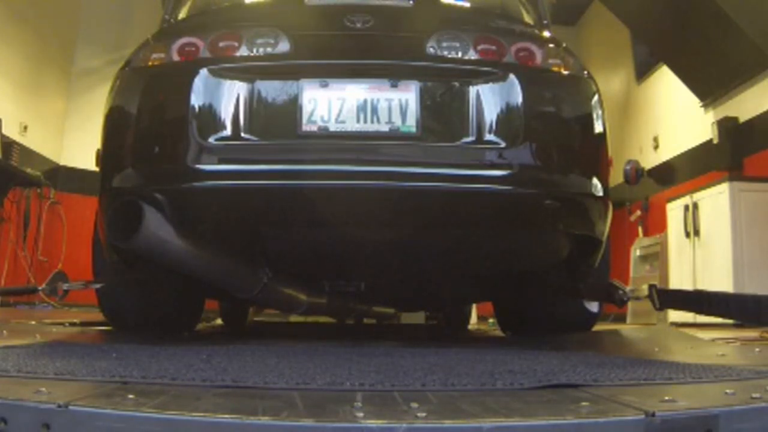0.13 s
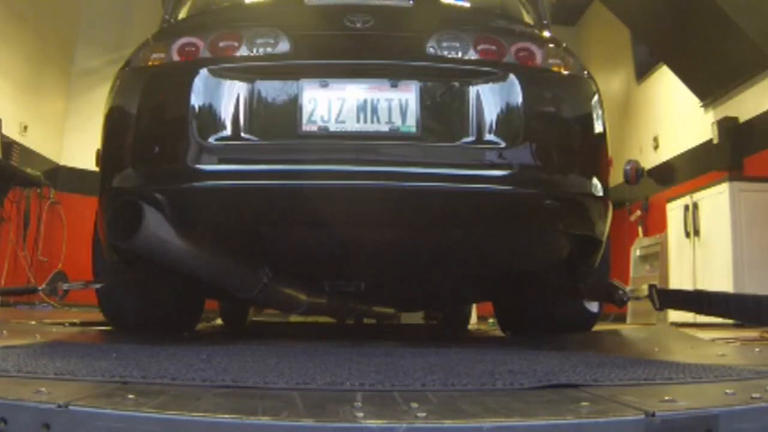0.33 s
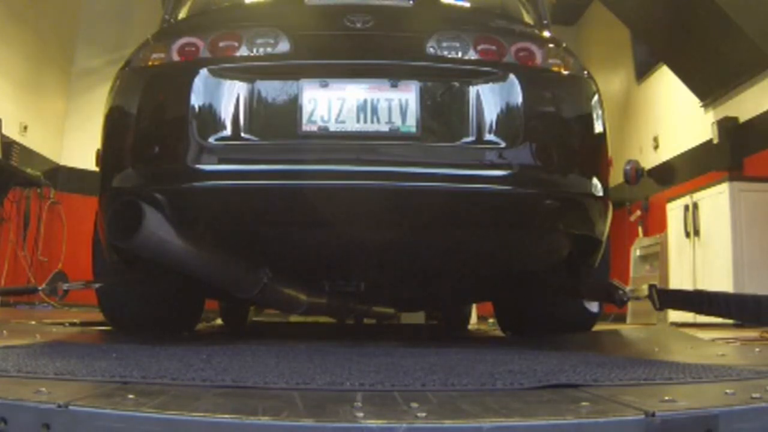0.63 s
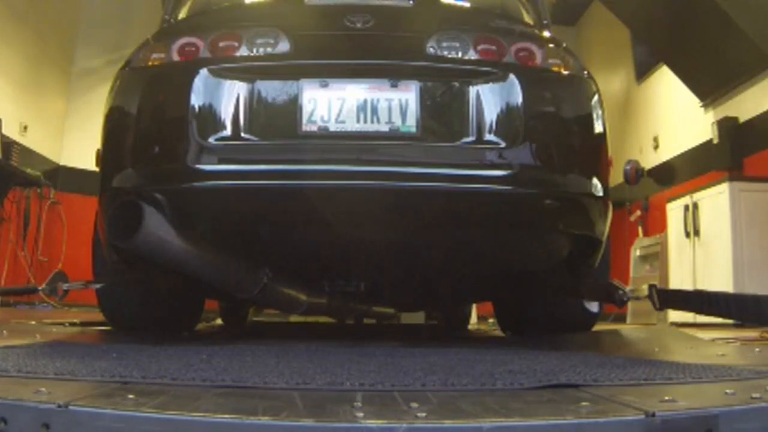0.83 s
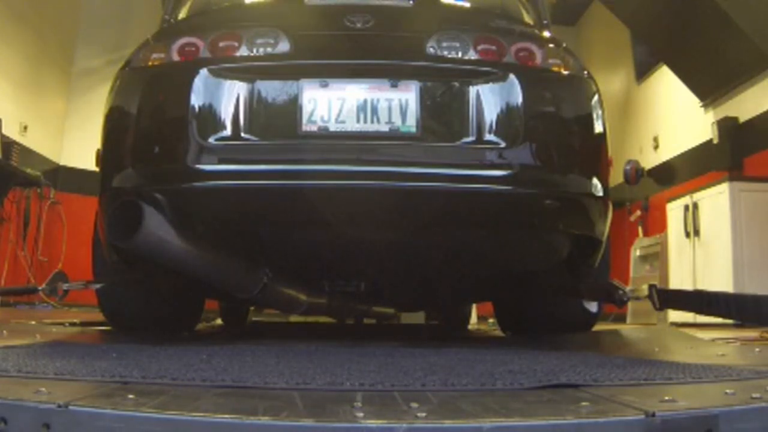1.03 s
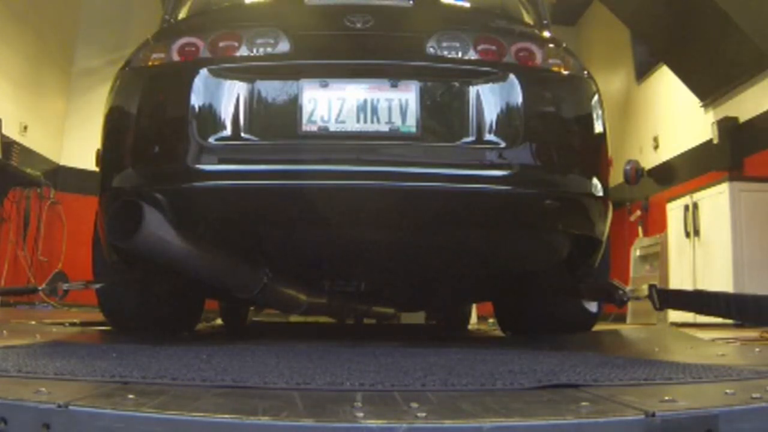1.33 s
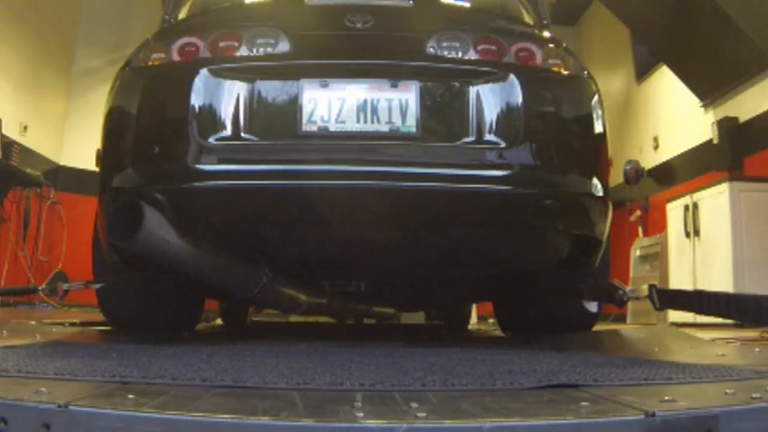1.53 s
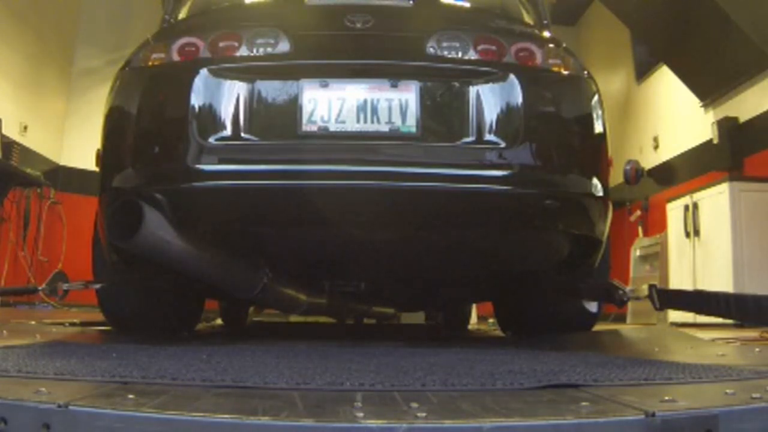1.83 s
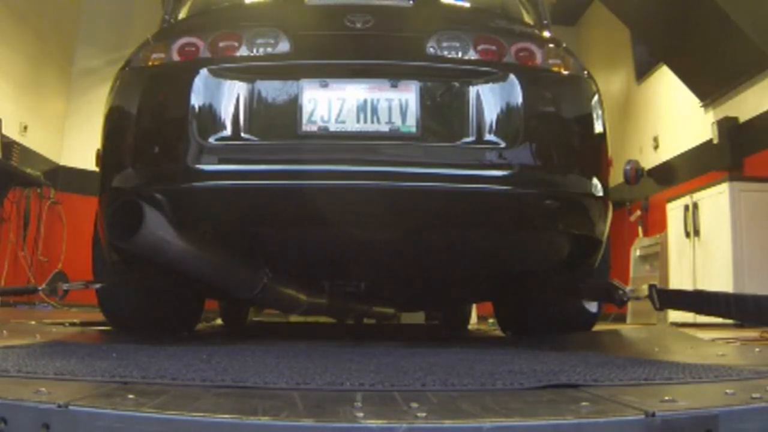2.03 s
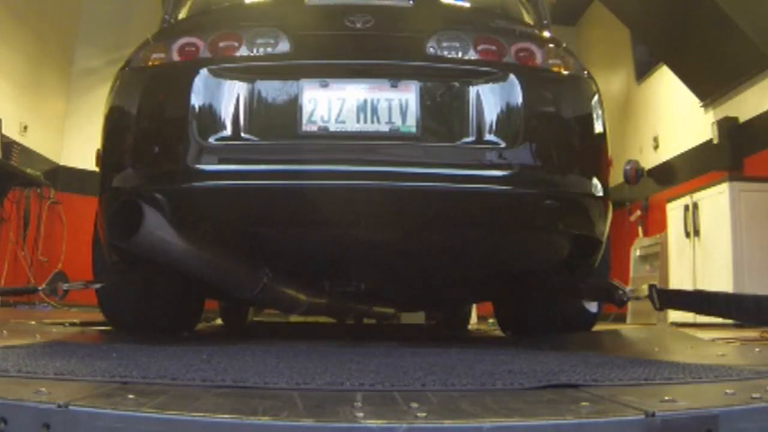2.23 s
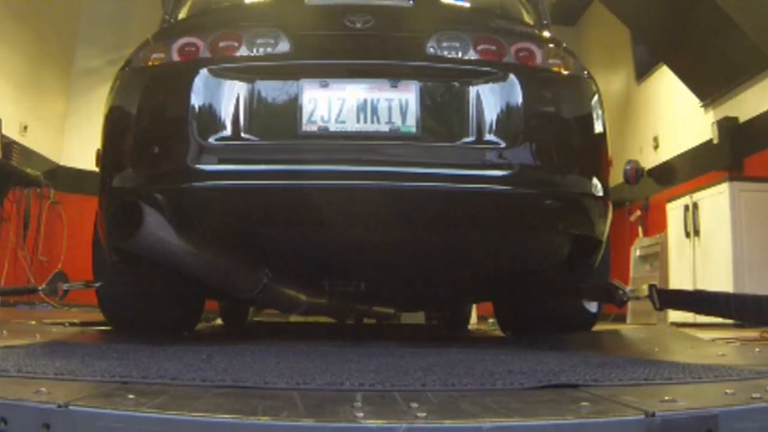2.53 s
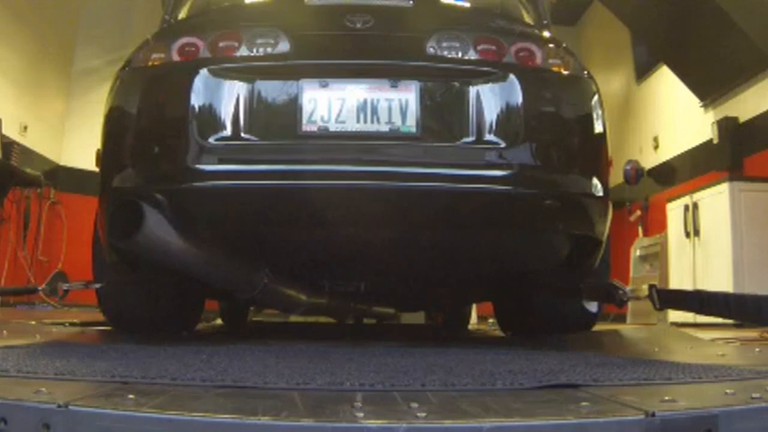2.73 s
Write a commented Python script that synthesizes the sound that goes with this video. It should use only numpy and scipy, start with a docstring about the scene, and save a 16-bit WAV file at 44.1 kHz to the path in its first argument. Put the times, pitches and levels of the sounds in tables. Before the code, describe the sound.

Close exhaust sound of a six-cylinder car in a workshop, low uneven idle first, then thudding pops and a quick rev, a short dip, another surge, a crackling burst and a rough, clipped roar with rushing gas.

```python
"""A six-cylinder engine heard from behind its tailpipe in a workshop: a lumpy idle, a rise to a held speed,
a second pull, a burst of misfires, then a loud steady howl that overloads the microphone.
The engine note is a stack of multiples of the firing rate; uneven firing adds burble and roar,
and gas rushes out as puffs of hiss. Pops are sudden pressure jumps with hiss, echoed by the workshop."""
import sys
import numpy as np
from scipy import signal
from scipy.fft import rfft, irfft, next_fast_len
from scipy.io import wavfile
from scipy.ndimage import uniform_filter1d

SR = 44100
rng = np.random.default_rng(int(sys.argv[2]) if len(sys.argv) > 2 else 0)


def dump(signal):
    """Clip the signal to [-1, 1] and save it as 16-bit WAV at the path in sys.argv[1]."""
    limited = np.clip(np.atleast_2d(signal).T, -1, 1)
    pcm = np.round(limited * 32767).astype(np.int16)
    wavfile.write(sys.argv[1], SR, pcm)


N = 127890

# Tone colour of the deep exhaust roar: f/Hz, relative level per Hz/dB
ROAR_COLOUR = [(200, -4.5), (450, -0.5), (700, -3.5), (950, -0.5), (1120, -7), (1350, -17.5)]
# Tone colour of the rushing gas: f/Hz, relative level per Hz/dB
RUSH_COLOUR = [(650, -18), (1100, -2), (1360, -3), (1570, -3), (1860, -6), (2020, -3.5), (2600, -11.5),
               (3040, -6.5), (3800, -14), (5500, -33.5)]
# Tone colour of the gas's treble hiss: f/Hz, relative level per Hz/dB
TREBLE_COLOUR = [(2650, -25.5), (4500, -2), (5200, -5), (7590, -16.5), (8820, -11.5), (9680, -18.5),
                 (10600, -21), (13400, -30), (15500, -46)]


def amp(db):
    """Turns decibels into an amplitude factor."""
    return 10 ** (np.asarray(db) / 20)


def rms_one(x):
    """Scales a signal to an rms (average strength) of 1."""
    return x / np.sqrt(np.mean(x ** 2) + 1e-20)


def in_time(rows):
    """Draws straight lines between table rows, giving one curve per column after the time."""
    s, *columns = np.transpose(rows)
    t = np.arange(N) / SR
    return [np.interp(t, s, column) for column in columns]


def drift(rate_hz):
    """Slow random wandering of rms 1: noise smoothed by two equal low-pass stages."""
    step = 40  # samples between the points of the slow curve
    r = np.exp(-2 * np.pi * step * rate_hz / SR)
    noise = rng.standard_normal(N // step + 2002)
    slow = signal.lfilter([1], [1, -2 * r, r * r], noise)[2000:]  # skip the filter's start-up
    return np.interp(np.arange(N) / step, np.arange(len(slow)), rms_one(slow))


def colour(x, spectrum):
    """Shapes x by a spectrum and the pipe's resonances, never sounding ahead of x; rms 1."""
    # Resonances of the pipe: f/Hz, width/Hz, lift/dB
    pipe = [(391, 8.8, 11.5), (885, 11, 7), (1049, 11, 9), (1788, 256, 10.5), (3155, 230, 2.5),
            (5140, 450, 5)]
    f = np.maximum(np.fft.rfftfreq(N, 1 / SR), 1)
    hz, db = np.transpose(spectrum)
    octaves_outside = np.abs(np.log2(f / np.clip(f, hz[0], hz[-1])))
    shape_db = np.interp(np.log(f), np.log(hz), db) - 40 * octaves_outside
    for centre_hz, width_hz, lift_db in pipe:
        shape_db = shape_db + lift_db / (1 + (2 * (f - centre_hz) / width_hz) ** 2)
    # Folding the cepstrum onto its first half makes the filter respond only after its input
    cepstrum = irfft(np.log(amp(np.maximum(shape_db, -120))), N)
    cepstrum[1:N // 2] *= 2
    cepstrum[N // 2 + 1:] = 0
    return rms_one(irfft(rfft(x) * np.exp(rfft(cepstrum)), N))


def orders(turns, rate_hz, levels_db, roar_db):
    """Multiples of the firing rate line up into one pressure dip per firing; some are weak and late."""
    # How the firings go: t/s, unevenness (0-1), lean of the dip toward a sharp rise/rad
    firing = [(0, .14, .9), (.58, .17, .9), (.65, .33, 1.0), (.95, .25, 1.2), (1.28, .12, 1.3),
              (1.38, .11, .6), (2.25, .08, .5), (2.29, 1., 1.5), (2.44, 1., 1.5), (2.47, .1, 1.5),
              (2.9, .07, 1.5)]
    # Orders above five, against the roar: f/Hz, level/dB
    upper_orders = [(330, -10), (780, -22), (1030, -10), (1200, -26.5), (1900, -19.5), (2150, -37)]
    waver_db, waver_hz = .9, 14  # each order wavers in level on its own

    uneven, lean = in_time(firing)
    weak, late = (np.interp(turns + .5, np.arange(2000), u) for u in rng.random((2, 2000)))
    angle = 2 * np.pi * (turns - uneven ** 2 * late)
    hz, upper_db = np.transpose(upper_orders)
    upper = [roar_db + np.interp(np.log(k * rate_hz), np.log(hz), upper_db, right=-60)
             for k in range(6, 19)]
    tone = np.zeros(N)
    for k, db in enumerate([*levels_db, *upper], 1):
        level = np.sqrt(2) * amp(db + waver_db * drift(waver_hz))
        tone -= level * np.cos(k * angle + lean)
    return tone * (1 + uneven * (1 - 2 * weak))


def gas(turns, rate_hz, burble_db, roar_db, rush_db, treble_db):
    """Each firing is stronger or weaker than the mean (burble, roar) and blows a puff of hiss."""
    # Tone colour of the low burble: f/Hz, relative level per Hz/dB
    burble_colour = [(42, -34.5), (60, 9), (88, 6), (130, 3), (200, -6), (300, -4.5), (420, -13),
                     (600, -29)]
    puff_share, puff_sharpness = .26, 2.04  # pulsing part of the hiss (0-1), fading per firing cycle
    flicker_db, flicker_hz = .6, 6.9  # rush and treble flicker together

    cycle = np.floor(turns).astype(int)
    fired = np.diff(np.floor(turns), prepend=0) > 0
    size = np.sqrt(3) * rng.uniform(-1, 1, N)[cycle]  # one random strength per firing, spread 1
    kicks = fired * size * np.sqrt(SR / rate_hz)
    puff = np.exp(-puff_sharpness * (turns % 1)) * amp(3.7 * size)
    hiss = rng.standard_normal((3, N)) * (1 - puff_share + puff_share * rms_one(puff))
    flicker = amp(flicker_db * drift(flicker_hz))

    burble = amp(burble_db) * colour(kicks + .39 * hiss[0], burble_colour)
    roar = amp(roar_db) * colour(.11 * kicks + hiss[0], ROAR_COLOUR)
    rush = flicker * amp(rush_db) * colour(hiss[1], RUSH_COLOUR)
    treble = flicker * amp(treble_db) * colour(hiss[2], TREBLE_COLOUR)
    return burble + roar + rush + treble


def pops():
    """Late burns bang in the pipe: pressure sags, jumps up and dies away, with a burst of hiss."""
    # Each pop: t/s, jump level/dB, half length/ms, hiss level/dB
    pop_rows = [(0.6127, -4, 3, -33), (.680, -16, 2.6, -33), (0.7961, -2, 2.2, -36), (0.906, -9, 2.2, -40),
                (0.995, -9.5, 2.36, -33), (1.154, -9, 2.1, -34), (1.2085, -8, 1.5, -32),
                (1.273, -8, 1.5, -30), (2.3125, -2, 0.5, -24), (2.3325, -3, 0.7, -23),
                (2.336, -4, 0.55, -22), (2.3572, -2, 0.4, -17), (2.364, -3, .5, -11), (2.418, -2, 0.5, -7),
                (2.459, -4, 0.36, -9), (2.746, -8, 1, -11)]
    jump_steepness = 5.
    crack_t60_s, crack_treble_db = .036, -25  # time for the hiss to fall 60 dB, share of its treble

    jumps, hits = np.zeros(N), np.zeros(N)
    for s, db, half_ms, hiss_db in pop_rows:
        near = slice(max(int((s - .03) * SR), 0), int((s + .03) * SR))
        u = (np.arange(N)[near] / SR - s) * 1000 / half_ms  # time from the jump, in half lengths
        jumps[near] += amp(db) * np.tanh(jump_steepness * u) * np.exp(.5 - u ** 2)
        hits[int(s * SR)] = amp(hiss_db)
    fading = signal.lfilter([1], [1, -amp(-60 / (crack_t60_s * SR))], hits)
    burst = uniform_filter1d(fading, size=30)  # softens the onset
    hiss = colour(rng.standard_normal(N), RUSH_COLOUR) + colour(rng.standard_normal(N), ROAR_COLOUR)
    hiss += amp(crack_treble_db) * colour(rng.standard_normal(N), TREBLE_COLOUR)
    return jumps + burst * hiss


def workshop(x):
    """Room echo from eight repeating delays whose high pitches die away sooner."""
    t60_s = .17  # time for the lowest pitches to fall 60 dB
    delays_s = [.0253, .0291, .0337, .0379, .0421, .0473, .0529, .0587]
    size = next_fast_len(N + SR)
    f = np.fft.rfftfreq(size, 1 / SR)
    echoes = 0
    for k, delay_s in enumerate(delays_s):
        kept = amp(-60 * delay_s * (1 + f / 3000) / t60_s)  # what survives each pass
        one_pass = kept * np.exp(-2j * np.pi * f * delay_s)
        echoes = echoes + (-1) ** k * (1 / (1 - one_pass) - 1)
    return irfft(rfft(x, size) * echoes, size)[:N]


def scene():
    """One running count of firings drives the note and the gas; the pops also echo in the workshop."""
    # Firing rate and its first five orders: t/s, f/Hz, then order 1, 2, 3, 4, 5 level/dB
    engine = [(0, 58.27, -30, -22, -13.5, -16, -29), (.14, 58.53, -28, -51, -19, -14, -24),
              (.19, 58.89, -28, -18, -18.5, -16.5, -57), (.27, 58.62, -26, -37.5, -11, -19, -15.5),
              (.34, 59.66, -29, -17, -28, -19, -21), (.385, 59.43, -15, -13, -13.5, -38, -40),
              (.47, 59.9, -28, -35, -16, -13.5, -22), (.54, 59.58, -23, -18, -23.5, -21, -19.5),
              (.61, 59.43, -35, -31, -19.5, -21, -40.5), (.7, 59.75, -24.5, -12, -24.5, -22, -18.5),
              (.85, 63.26, -20, -29.5, -25, -42, -32.5), (.96, 66.58, -18, -18.5, -24, -37, -20.5),
              (1.04, 68.91, -28, -17, -36, -28.5, -28.5), (1.15, 73.05, -18, -16.5, -26.5, -27.5, -39),
              (1.2, 74.75, -19.5, -18, -36.5, -20.5, -28), (1.25, 75.82, -20, -15.5, -22.5, -32, -41),
              (1.32, 91.93, -12.5, -24, -29, -49, -34), (1.4, 114.3, -17.5, -18.5, -20, -20.5, -27),
              (1.46, 129.6, -16.5, -21.5, -16, -28, -27.5), (1.54, 142.5, -12, -24.5, -24.5, -24, -37),
              (1.61, 149.2, -13, -17.5, -26, -30, -31), (1.77, 149.5, -20.5, -18, -33, -38.5, -42),
              (1.87, 142.5, -15.5, -29, -33, -31.5, -44), (1.95, 141.1, -11.5, -19, -25.5, -21, -28.5),
              (2.03, 152.7, -13, -16, -19.5, -27, -30), (2.11, 178.3, -20, -20.5, -23, -22.5, -23),
              (2.23, 234.3, -20.5, -17.5, -22, -26, -28), (2.3, 251.6, -24.5, -21.5, -44, -39, -51),
              (2.43, 247.7, -29, -35, -25, -14.5, -26), (2.48, 243.7, -21, -26.5, -24.5, -29, -27),
              (2.56, 241.9, -29, -12, -12.5, -10, -40), (2.9, 237.6, -16, -13, -14, -10.5, -27)]
    # Uneven firing and gas: t/s, burble level/dB, roar level/dB, rush level/dB, treble level/dB
    gas_levels = [(0.0, -19, -39, -40, -58), (0.02, -22, -29, -42, -60), (0.11, -18, -29.5, -35, -52.5),
                  (0.16, -10.5, -29, -35, -55), (0.18, -18, -30, -38, -57.5),
                  (0.35, -15, -26.5, -33.5, -52), (0.43, -13, -31.5, -37.5, -58),
                  (0.49, -15, -25, -32, -50.5), (0.62, -19, -27.5, -37.5, -56.5),
                  (0.65, -23, -29.5, -38, -59), (0.69, -19, -31.5, -36.5, -53),
                  (0.78, -12.5, -28.5, -38, -54), (0.84, -22.5, -37, -40.5, -59),
                  (0.91, -20.5, -28.5, -36, -55), (1.16, -21.5, -34, -42, -58),
                  (1.35, -26.5, -27, -33, -49.5), (1.39, -26.5, -23.5, -31, -45.5),
                  (1.57, -39, -26, -45, -63), (1.77, -21, -26.5, -38, -59.5),
                  (1.94, -18.5, -21, -32, -54.5), (2.01, -35, -28.5, -47.5, -61),
                  (2.12, -28.5, -18, -24.5, -48.5), (2.3, -26, -22, -30.5, -45.5),
                  (2.352, -17, -16, -21, -39), (2.365, -29, -15, -18, -33), (2.53, -21, -15, -18.5, -39.5),
                  (2.84, -32, -18.5, -20, -39), (2.9, -20, -10, -17.5, -42)]
    first_turn = .7  # how far the first firing cycle has run at the start
    wobble, wobble_hz = .002, 26.  # random wander of the firing rate, as a fraction
    shop_db = -9.5

    rate_hz, *levels_db = in_time(engine)
    layers_db = in_time(gas_levels)
    turns = first_turn + np.cumsum(rate_hz * (1 + wobble * drift(wobble_hz))) / SR
    bangs = pops()
    note = orders(turns, rate_hz, levels_db, layers_db[1])
    exhaust = note + gas(turns, rate_hz, *layers_db) + bangs
    return (exhaust + amp(shop_db) * workshop(bangs))[None]


def record(dry):
    """The microphone flattens peaks off-centre, a bass cut tilts the flats, and the top is cut."""
    # Overload: t/s, ceiling (amplitude), off-centre bias (amplitude)
    overload = [(0, 0.61, -0.036), (2.34, 0.67, 0.017), (2.37, 0.37, -0.092), (2.6, 0.35, 0.15),
                (2.9, .42, 0.099)]
    knee = 4.  # higher bends more abruptly into the ceiling
    bass_cut_hz, top_cut_hz = 52, 15700

    ceiling, bias = in_time(overload)
    pushed = dry + bias
    flattened = pushed / (1 + np.abs(pushed / ceiling) ** knee) ** (1 / knee) - bias
    tilted = signal.lfilter(*signal.butter(1, bass_cut_hz, "high", fs=SR), flattened)
    return signal.sosfilt(signal.cheby2(8, 40, top_cut_hz, fs=SR, output="sos"), tilted)


dry = scene()
out = record(dry)
dump(out)
```